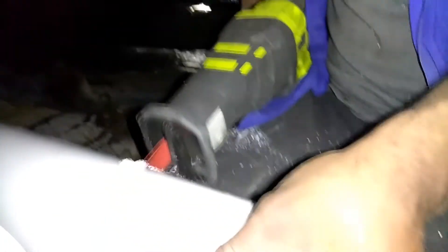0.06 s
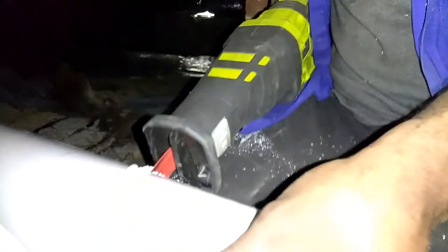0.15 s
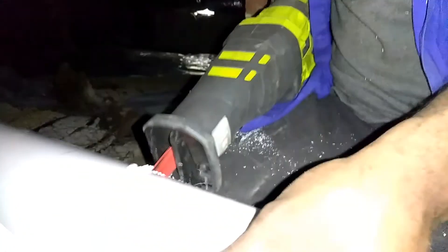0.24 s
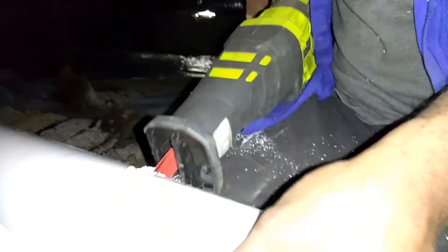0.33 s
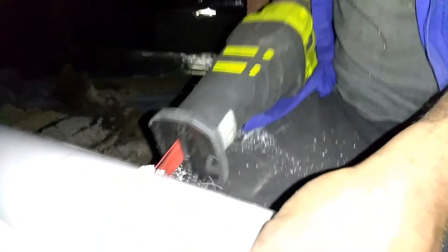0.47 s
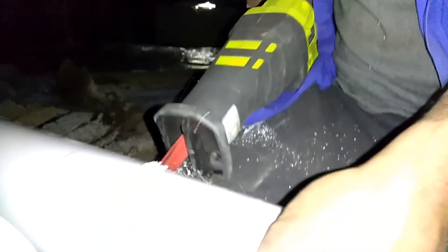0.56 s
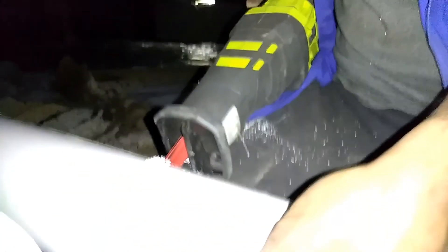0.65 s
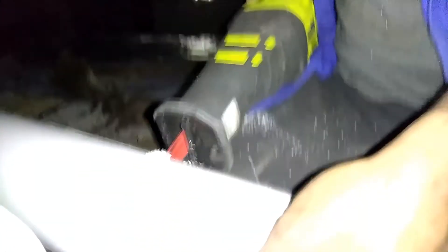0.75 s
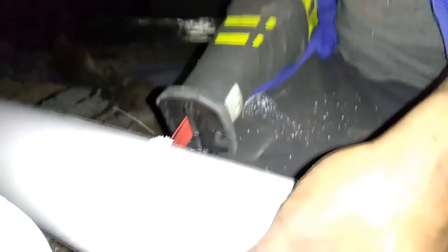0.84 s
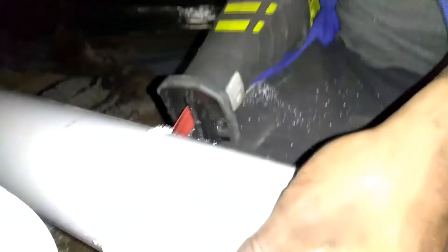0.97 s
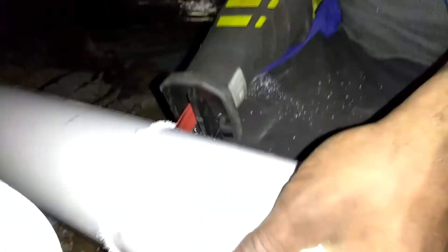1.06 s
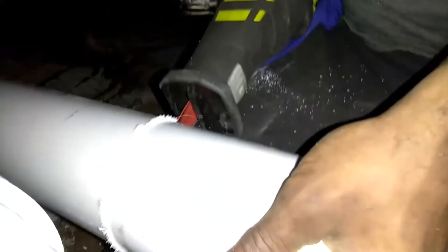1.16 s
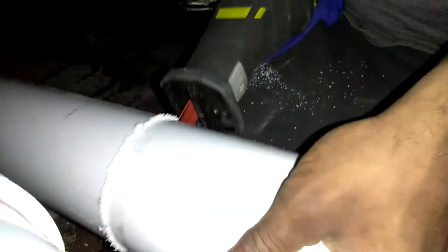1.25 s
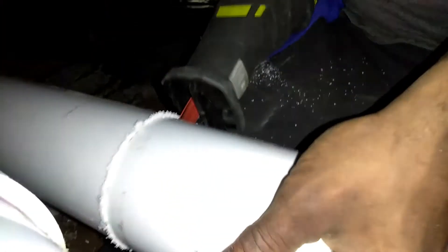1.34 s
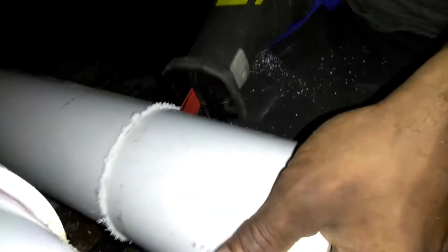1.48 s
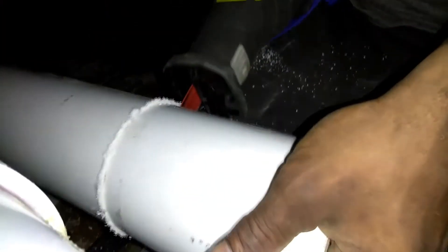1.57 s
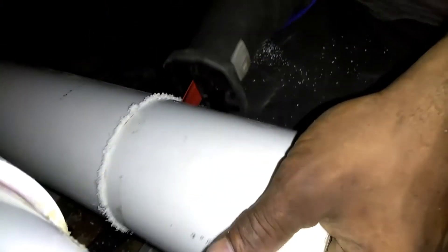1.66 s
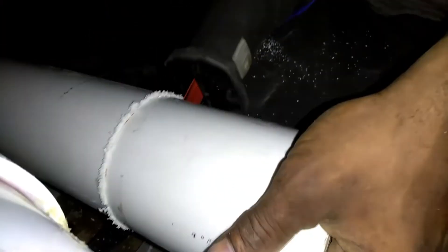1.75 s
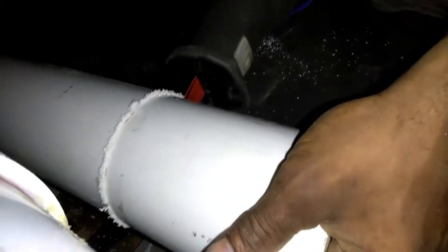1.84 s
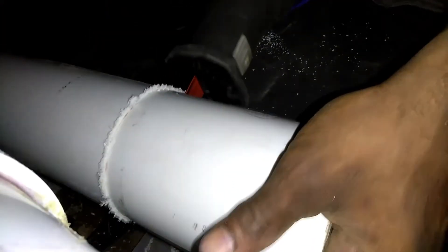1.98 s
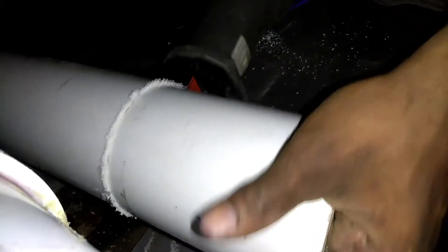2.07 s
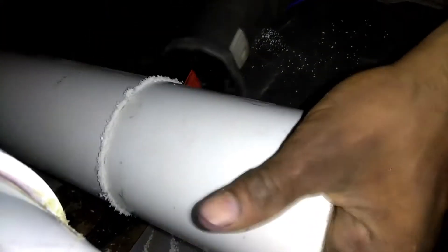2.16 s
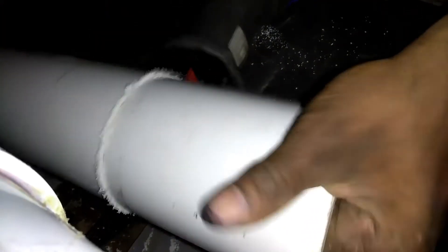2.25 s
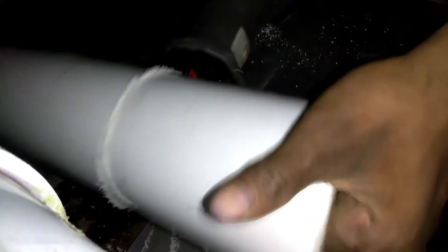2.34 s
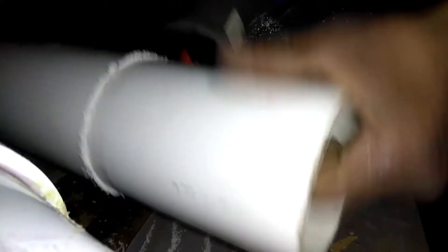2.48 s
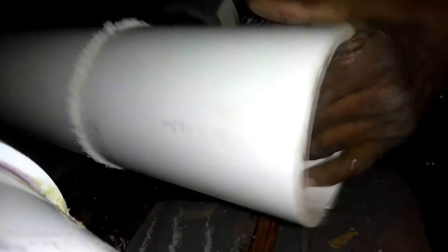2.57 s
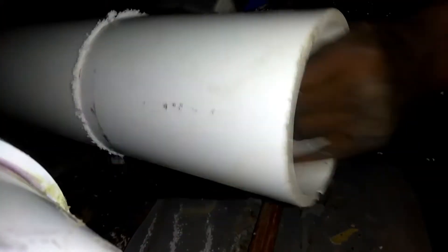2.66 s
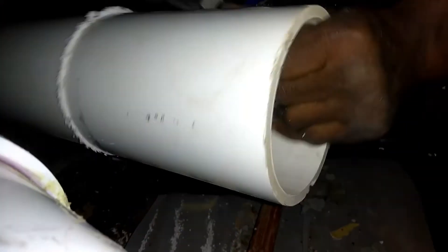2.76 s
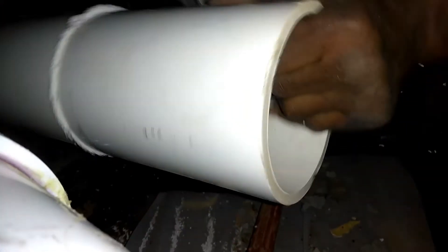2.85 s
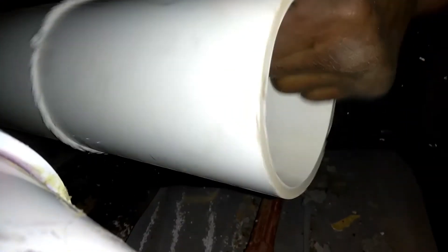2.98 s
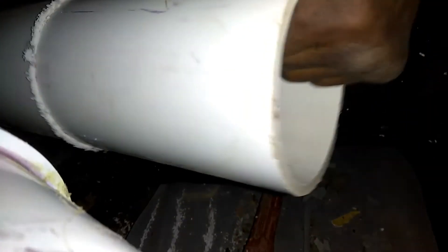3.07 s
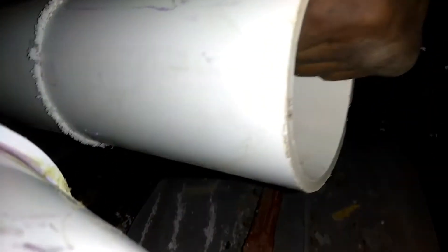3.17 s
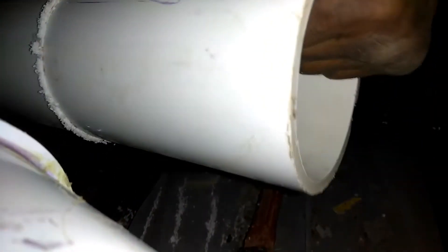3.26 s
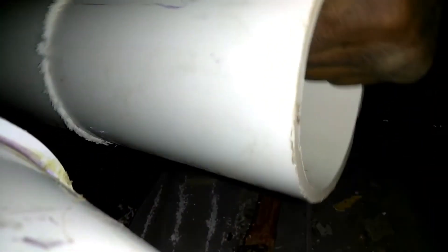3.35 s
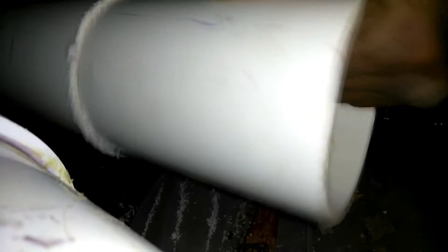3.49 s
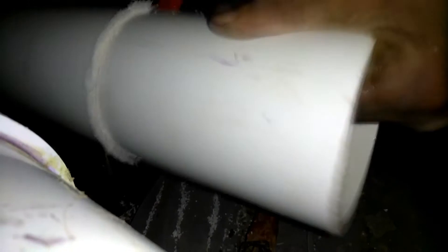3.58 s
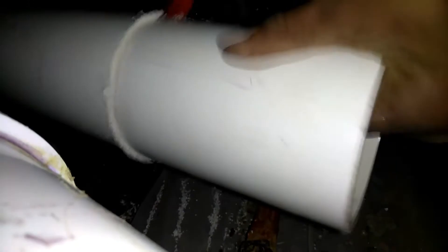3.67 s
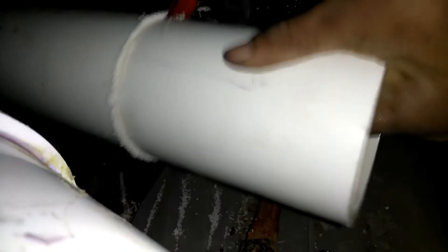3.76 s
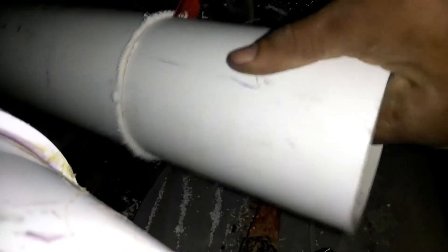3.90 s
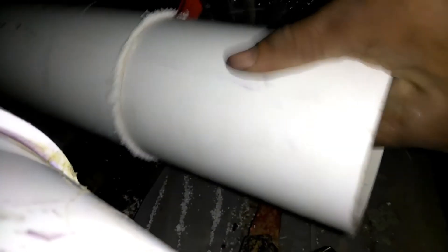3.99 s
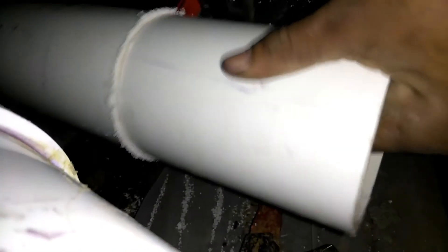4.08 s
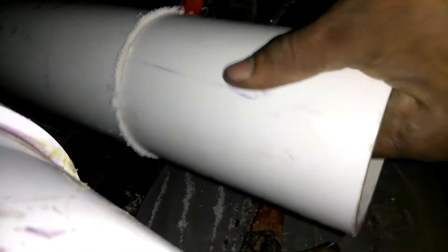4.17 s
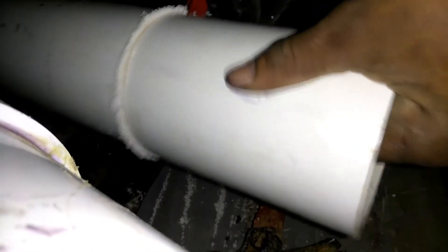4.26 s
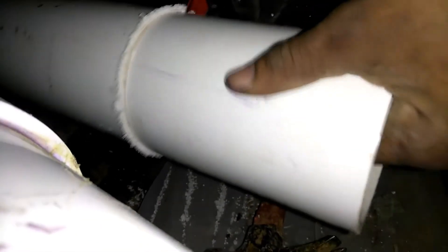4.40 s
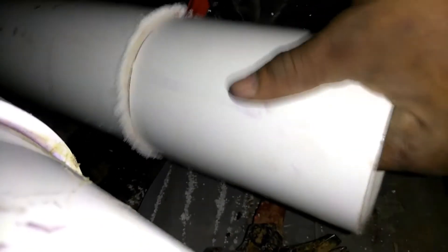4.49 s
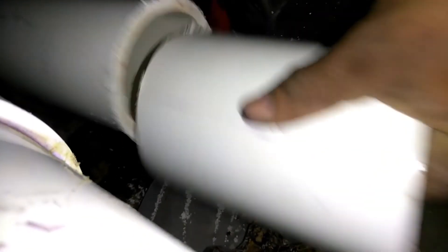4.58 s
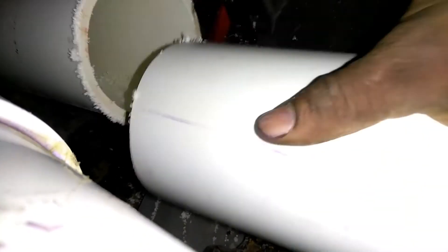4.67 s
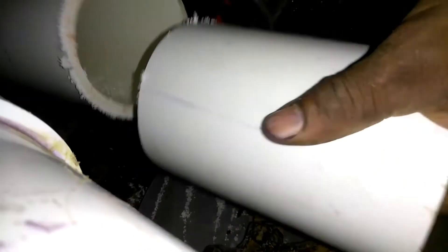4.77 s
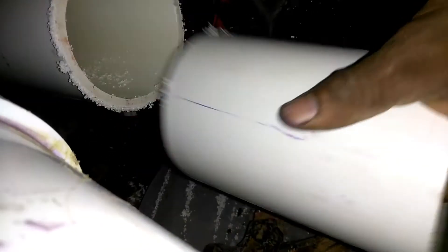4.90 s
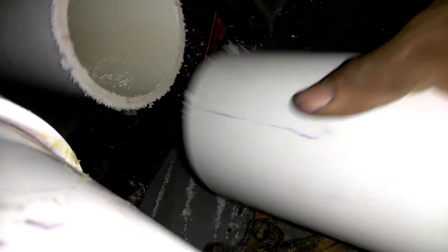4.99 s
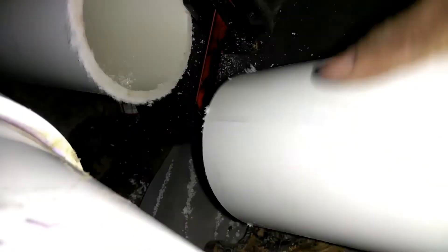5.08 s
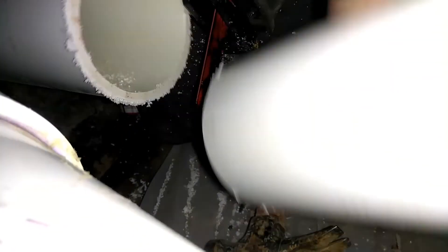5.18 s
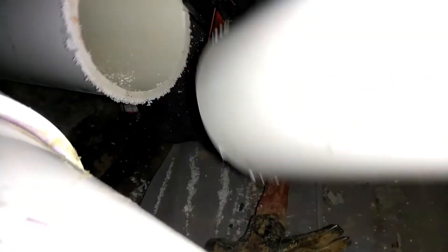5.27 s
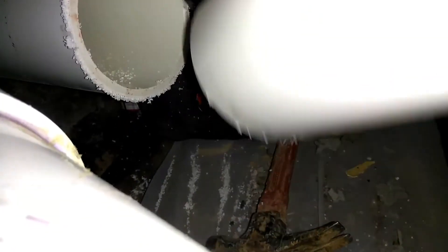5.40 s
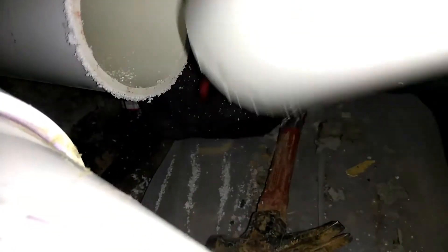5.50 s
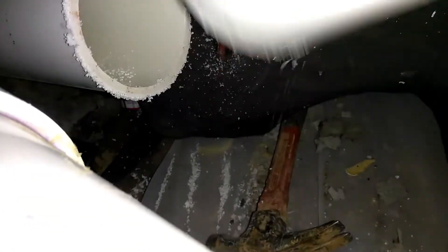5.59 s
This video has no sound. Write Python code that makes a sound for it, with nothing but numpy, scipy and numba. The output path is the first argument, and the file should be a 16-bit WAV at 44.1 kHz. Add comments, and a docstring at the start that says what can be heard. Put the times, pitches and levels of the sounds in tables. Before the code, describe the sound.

Up close, a power saw buzzes harshly through a hollow plastic pipe, stops, restarts with a bark, cuts the end free and runs down.

```python
"""A reciprocating saw cuts a plastic pipe at close range: teeth rasp the wall and ring the blade, gearbox
rattles, motor whines, the wall sings; blade chirps, microphone thumps, jolts and chatter follow. It runs down
at 2.55 s; in the pause the pipe ticks, rubs and creaks on the blade. At 3.3 s the blade slaps, bites and cuts
the end free at 4.58 s; run-down from 4.99 s leaves low tones and rubbing. Grains, noise and sines drive
resonances; hum and rumble lie below; two unequal ports limit, and the loudest peaks flatten."""
import sys
import numpy as np
from scipy import signal
from scipy.fft import rfft, irfft, next_fast_len
from scipy.io import wavfile
from scipy.ndimage import uniform_filter1d
from numba import njit

SR = 44100
rng = np.random.default_rng(int(sys.argv[2]) if len(sys.argv) > 2 else 0)


def dump_mix(stems):
    """Bounce the given channels to the path in sys.argv[1] as a 16-bit WAV at rate SR."""
    frames = np.atleast_2d(stems).T  # one column per channel
    limited = np.clip(frames, -1, 1)  # hard clip at full scale
    pcm = np.round(limited * 32767).astype(np.int16)
    wavfile.write(sys.argv[1], SR, pcm)


N = 248539

# Mode and colour levels are relative: each set is scaled to keep the power of white noise.
# low hum of the place: f/Hz, relative level/dB
HUM_TONES = [(59.2, -42), (91.5, -44)]
# rumble of the place: f/Hz, density/dB per Hz
AIR_COLOUR = [(25, -6), (60, 4.5), (120, -8), (180, -7.5), (250, -12.5), (400, -22), (700, -19),
              (1500, -28.5), (5000, -41), (8000, -32.5), (12000, -21), (15500, -46)]
# trigger: on t/s, off t/s, run-down/dB per s
TRIGGER_RUNS = [(-.1, 2.553, 158), (3.302, 4.992, 127.5)]
# crank speed under load, one list per run: t/s, rate/strokes per s
CRANK_SPEEDS = [
    [(0, 40.11), (.2, 37.8), (.4, 37.15), (.6, 38.85), (.75, 37.41), (1.55, 37.14), (1.9, 38.8),
     (2.1, 38.87), (2.4, 34.59)],
    [(3.45, 36.84), (3.65, 34.02), (3.85, 36.4), (4.1, 36), (4.5, 37.2), (4.62, 40)],
]
# how firmly the teeth engage: t/s, stroke depth/0-1
FEED_DEPTH = [(0, 0.32), (.55, 0.38), (.74, 0.23), (.95, 0.35), (1.3, 0.43), (2.2, 0.16), (2.55, 0.49),
              (2.65, 0.46), (3.35, 0.2), (3.6, 0.34), (4.1, 0.15), (4.7, 0.16), (5.0, 0), (5.12, 0.04)]
# first cut, loose and loud, then settled in the kerf:
# t/s, relative levels/dB of pipe wall, gearbox rattle, blade ring, tooth hiss
CUT_1_LEVELS = [(0, -19, -17.5, -19.5, -27.5), (.4, -20.5, -21.5, -20, -18.5), (.7, -17, -26, -27, -12),
                (.84, -21.5, -18.5, -18, -15.5), (1.05, -27.5, -26.5, -20.5, -7.5),
                (1.45, -19, -24.5, -21, -7), (2.0, -24, -30, -35.5, -15), (2.25, -25.5, -23, -27.5, -7.5),
                (2.43, -23, -27.5, -27.5, -10.5), (2.5, -22.5, -48, -28.5, -16.5),
                (2.56, -27.5, -34.5, -39, -21), (2.68, -28.5, -34, -38, -31)]
# second cut bites, breaks through, runs free: same columns
CUT_2_LEVELS = [(3.33, -27, -13, -30, -10.5), (3.49, -34.5, -20, -23, -19.5), (3.59, -18, -17, -21, -12.5),
                (3.95, -18, -12.5, -20, -9.5), (4.57, -20, -15.5, -15.5, -8), (4.65, -25.5, -20, -24, -8),
                (4.85, -32.5, -23, -28.5, -17), (4.89, -21, -11, -22.5, -4),
                (4.98, -45.5, -15.5, -24.5, -13.5)]
# wall resonance, shifting with grip and kerf length: t/s, f/Hz
WALL_PITCH = [(0, 575), (.13, 687), (.86, 590), (.98, 437), (1.09, 480), (1.25, 620), (2.1, 540),
              (2.27, 673), (4.4, 642)]
# pipe resonances: f/Hz, width/Hz, level/dB
PIPE_RESONANCES = [(475, 193, 1), (638.5, 12, 12), (785, 120, 0), (975, 150, 1.5), (1330, 31, 2),
                   (1793, 64, -5), (2243, 33, -1.5), (2467, 71, 1.5)]
# blade resonances: f/Hz, width/Hz, level/dB
BLADE_RESONANCES = [(3074, 140, -5.5), (3620, 75, -15), (4075, 85, 2), (4332, 81, 2), (4664, 110, -2),
                    (5140, 37, -0.5), (5910, 120, -7)]
# gearbox rattle: f/Hz, density/dB per Hz
GEARBOX_COLOUR = [(30, -70), (120, -5.5), (250, -4.5), (350, -6.5), (600, -4.5), (900, -4.5), (1200, 2),
                  (1700, 3), (2200, 3.5), (2900, 1.5), (3550, -2.5), (4400, -11), (5600, -3.5), (7500, -5),
                  (10000, -1), (15000, -28)]
# tooth hiss: f/Hz, density/dB per Hz
TEETH_COLOUR = [(3500, -49), (5500, -16), (7500, -4.5), (9500, 0), (10600, 3), (11500, 10), (12200, 9.5),
                (13200, 8.5), (14400, 0), (15500, -4.5)]
# shaking of the whole pipe: f/Hz, density/dB per Hz
SHAKE_COLOUR = [(25, -42.5), (55, -25), (85, -2.5), (120, -3), (170, 1), (260, -8), (450, -19), (1000, -58)]
# blade squeals: f/Hz, width/Hz, relative level/dB, moment/turns
SQUEAL_RINGS = [(10690, 200, -1, -0.2), (11940, 300, 2.5, 0.2)]
# all squeals together: t/s, relative level/dB
SQUEAL_LEVELS = [(0, -17), (.6, -18), (.9, -13.5), (1.5, -10.5), (1.8, -18), (2.4, -17.5), (2.55, -39),
                 (3.3, -21), (3.6, -12), (4.6, -14)]
# plunger drone: multiple of stroke rate/1, level at full stroke depth/dB
THROB_HARMONICS = [(1, -44), (2, -34), (3, -34.5), (4, -38)]
# wall note on its strongest mode, deep kerf: t/s, f/Hz, level/dB
SINGING_NOTE = [(0, 656, -32), (.12, 673, -26), (.4, 645, -22), (.65, 650, -31.5), (.85, 613, -28.5),
                (.95, 651, -54)]
# upper modes ringing along with that note: f/Hz, width/Hz, level/dB
SINGING_RESONANCES = [(1781, 62, -5), (2586, 69, -6.5), (3030, 110, -4), (4740, 180, -7.5),
                      (5780, 150, -13.5), (12050, 680, -7), (14200, 780, -9)]
# blade chirp, falling as its free length grows: t/s, f/Hz, level/dB
CHIRP_NOTE = [(0, 4780, -20.5), (.3, 4570, -16.5), (.5, 4610, -27), (.72, 4370, -32), (.83, 4280, -13.5),
              (1.1, 4090, -27.5), (1.2, 4265, -18), (1.4, 4275, -20.5), (1.7, 4193, -31), (2.0, 4070, -45)]
# low thumps as the microphone is shaken or handled:
# t/s, thump level/dB, judder level/dB, judder t60/s, loose-end ring level/dB
MIC_THUMPS = [(0.657, -19.5, -23.5, 0.43, -34), (0.7, -24, -32.5, 0.2, -48), (0.748, -27, -26, 0.28, -50),
              (0.79, -25, -32.5, 0.15, -49), (3.305, -22, -21, 0.46, -36), (4.868, -22.5, -21, 0.56, -25.5),
              (4.974, -27, -31, 0.17, -43)]
# judder: f/Hz, density/dB per Hz
JUDDER_COLOUR = [(25, -34), (55, -11), (85, -6.5), (130, -3.5), (175, -5), (230, -14), (400, -33),
                 (1000, -65)]
# loose end of the pipe: f/Hz, width/Hz, level/dB
LOOSE_END_RESONANCES = [(377, 150, -23), (1105, 68, 9), (1217, 73, 7.5), (1440, 67, 2), (2046, 110, 7),
                        (2530, 67, -17), (4510, 90, -12.5)]
# blade binds and jolts the pipe: t/s, level/dB, length/s
BLADE_JOLTS = [(0.667, -3.5, 0.03), (0.699, -9, 0.059), (0.785, -13, 0.03), (2.202, 1.5, 0.023),
               (2.321, -9.5, 0.03), (2.331, -13, 0.03), (2.387, -21.5, 0.049), (2.422, -13.5, 0.021),
               (2.46, -27.5, 0.055), (2.503, -31.5, 0.015), (2.518, -20.5, 0.013), (2.581, -23, 0.036),
               (3.294, -33.5, 0.011), (3.304, -12, 0.015), (3.317, -18, 0.12), (3.583, -13.5, 0.023),
               (3.694, -11, 0.026), (3.719, -7.5, 0.014), (4.866, -12.5, 0.029)]
# teeth chatter on the wall, one list per cut: t/s, f/Hz, level/dB
CHATTER_NOTES = [
    [(.85, 500, -41.5), (.93, 477.9, -17.5), (1.0, 452.6, -22), (1.11, 474, -18), (1.18, 650, -32),
     (1.26, 516, -17), (1.33, 750, -34), (1.46, 490, -17.5), (1.56, 590, -27), (1.7, 500, -16),
     (1.88, 590, -26), (2.0, 480, -26), (2.15, 484, -19)],
    [(3.52, 560, -16.5), (3.56, 559.8, -29), (3.6, 590, -16), (3.72, 612.5, -21), (4.1, 539.7, -20),
     (4.3, 490, -21), (4.61, 579, -20.5)],
]
# burrs snap at the cut edge: t/s, treble level/dB, body level/dB, t60/s
BURR_TICKS = [(2.61, -17, -42, 0.026), (2.642, -30, -35, 0.072), (2.742, -29.5, -43, 0.02),
              (2.779, -36, -58, 0.015), (2.902, -22, -40, 0.042), (2.909, -29, -35.5, 0.038),
              (2.946, -22, -37, 0.02), (2.987, -25, -44, 0.016), (3.017, -25.5, -54, 0.011),
              (3.058, -19.5, -58, 0.01), (3.2, -30, -20, 0.018), (3.206, -15, -14.5, 0.018),
              (3.234, -39, -44, 0.025), (5.314, -39, -62, 0.015), (5.342, -35.5, -58, 0.014),
              (5.522, -43, -66, 0.016), (5.576, -35, -58, 0.014)]
# treble of a snap: f/Hz, density/dB per Hz
SNAP_COLOUR = [(700, -22), (3000, -18.5), (6000, -16.5), (8500, -4.5), (10500, 10), (12000, 12), (13500, 4),
               (15500, -17.5)]
# wall rung by a snap, one mode lingers: f/Hz, width/Hz, level/dB
SNAP_RESONANCES = [(950, 400, -13), (1710, 330, 1), (2213, 18, 3), (2380, 630, 7.5), (3800, 300, 6.5),
                   (5100, 900, -14), (7540, 2000, -21)]
# hand slides on the plastic: t/s, level/dB, t60/s
HAND_RUBS = [(2.72, -45, 0.43), (2.888, -35.5, 0.37), (2.96, -44.5, 1), (3.13, -48, 1.0), (5.19, -45, 0.6),
             (5.4, -58, 0.9), (5.515, -49.5, 0.68), (5.57, -57, 0.27)]
# rubbing: f/Hz, density/dB per Hz
RUB_COLOUR = [(300, -7.5), (700, -1), (1200, -11), (3000, -2), (6000, -11.5), (8500, -5), (10500, 5),
              (12000, 6), (13500, -0.5), (15500, -12)]
# last strokes drag in the kerf: t/s, level/dB, length/s
COAST_DRAGS = [(2.645, -47, .025), (2.71, -47, .035)]
# kerf rung by the drags: f/Hz, width/Hz, level/dB
DRAG_RESONANCES = [(1090, 200, 7), (2500, 500, -1), (3570, 400, 1.5)]
# kerf rung by a slip: f/Hz, width/Hz, level/dB
KERF_RESONANCES = [(500, 190, -25), (1000, 300, -6.5), (1430, 200, -22), (1710, 150, 6), (2140, 180, 8),
                   (3360, 250, 3.5), (3750, 260, 2), (4900, 410, -13), (11500, 2300, -29)]
# restart, blade slaps in the kerf until it bites: t/s, level/dB
SLAP_LEVELS = [(3.306, -14.5), (3.39, -16), (3.44, -24), (3.48, -32.5)]
# resonances rung by the slaps: f/Hz, width/Hz, level/dB
SLAP_RESONANCES = [(1270, 180, -10.5), (1580, 90, 1.5), (1850, 90, 3), (2150, 150, 2), (2600, 400, -5),
                   (11800, 2200, -11.5)]
# tones lingering in the open pipe: f/Hz, width/Hz, level/dB
HOLLOW_RESONANCES = [(179, 14, -8), (246, 12, 4.5), (277, 12, 1), (328, 18, -6)]
# microphone ports: f/Hz, side minus mid level/dB, left minus right level/dB
PORT_RESPONSE = [(60, 9.5, -1), (250, 6.5, 1.5), (623, 8, 0), (1210, 1.5, 0.5), (2430, 0, 3), (4260, 0, 0),
                 (8000, -0.5, 2), (10020, 1, 7), (10500, -35.5, 33.5), (13500, 8, 16.5), (16100, -21, 14.5)]

TIME = np.arange(N) / SR
SIZE = next_fast_len(N + 4096, True)
FREQ = np.fft.rfftfreq(SIZE, 1 / SR) + 1e-3
OPPOSED = np.array([[1], [-1]])  # mid and side of opposite sign

HUM_WAVER_DB = 3.5
ATTACK_S, SPIN_UP_S, COAST_S = .023, .0186, .26
WALL_WANDER, WALL_WANDER_PER_S = .087, 10
WALL_LOWEST_HZ = 300  # the wall radiates little below this
# shares of the mode frequency: free length changes bend the blade, grip bends the pipe
BLADE_SWEEP, BLADE_WANDER, PIPE_WANDER = .022, .014, .014
STROKE_SCATTER_DB, BITE_SCATTER_DB = 1.1, 1.8
PULL_MOMENT_TURNS, PULL_LENGTH_TURNS, PULL_DB = .8, .3, 9  # gain at full stroke depth
SHAKE_DB = -8  # relative to the wall at full stroke depth
SQUEAL_DEPTH = .85
CHIRP_MOMENT_TURNS, CHIRP_LENGTH_TURNS, CHIRP_GLIDE, CHIRP_WANDER = .88, .36, .06, .018
THUMP_HZ, THUMP_RISE_S, THUMP_T60_S = 134, .007, .07
FREE_S, ATTACHED_DB, FREE_DB = 4.58, -45, -25.5
LOOSE_END_FADE_DB_PER_S = 89.5
END_RING_RISE_S, END_RING_T60_S = .029, .35
JOLT_SHAKE_DB = -21  # relative to the jolt
BITE_SHARPNESS, BITE_GLIDE, BITE_WANDER = 1.6, .07, .05
RUB_ATTACK_S, RUB_UNEVEN_DB, RUB_UNEVEN_PER_S = .037, 2, 90
CREAK_S, CREAK_HOLD_S, CREAK_DB = 3.173, .012, -24.5
CREAK_RISE_DB_PER_S, CREAK_FALL_DB_PER_S = 850, 700
SLIP_HZ, SLIP_SAG_OCTAVES_PER_S = 481, 16
CREAK_TOP_HZ = 6040  # the plastic dulls the slips above this
HOLLOW_RISE_S, HOLLOW_DB, HOLLOW_T60_S = .029, -52, 2.9
PORT_TOP_HZ = 15650


def undb(db):
    """Decibels to gain."""
    return 10 ** (np.asarray(db) / 20)


def curves(rows):
    """Table columns, joined by straight lines in time."""
    t_s, *columns = np.transpose(rows)
    return [np.interp(TIME, t_s, column) for column in columns]


def during(rows):
    """1 while a table lasts, with short ramps outside."""
    start_s, end_s = rows[0][0], rows[-1][0]
    return np.interp(TIME, [start_s - .008, start_s, end_s, end_s + .011], [0, 1, 1, 0])


def colour(points, column=1):
    """Gain at every frequency, from dB points joined over log frequency."""
    table = np.transpose(points)
    return undb(np.interp(np.log(FREQ), np.log(table[0]), table[column]))


def modes(rows):
    """Complex response of a set of damped resonances."""
    return sum(undb(db) / (1 + 1j * (FREQ ** 2 - hz ** 2) / (FREQ * width_hz))
               for hz, width_hz, db in rows)


def through(x, response):
    """Filter with a response scaled so that white noise keeps its power."""
    response = response / np.sqrt(np.mean(abs(response) ** 2))
    return irfft(rfft(x, SIZE) * response, SIZE)[..., :N]


def unit(x):
    """Scale to rms 1."""
    return x / np.sqrt(np.mean(x ** 2))


def noise():
    """Two unrelated white noises, for mid and side."""
    return rng.standard_normal((2, N))


def walk(knots_per_s):
    """Random curve with a spread near 1: normal draws joined by lines."""
    knots = rng.standard_normal(4096)
    return 1.5 * np.interp(TIME * knots_per_s, np.arange(len(knots)), knots)


def grains(per_s, spread_db):
    """Tiny random impacts of unequal size, each in both mid and side."""
    hits = rng.random(N) < per_s / SR
    size = undb(spread_db * np.minimum(rng.exponential(size=N), 4))
    return unit(noise() * hits * size)


@njit
def resonator(x, hz, width_hz):
    """Band-pass with a moving centre and unit peak gain."""
    y, band, low = np.empty(len(x)), 0., 0.
    for i in range(len(x)):
        g, k = np.tan(np.pi * hz[i] / SR), width_hz / hz[i]
        v = (band + g * (x[i] - low)) / (1 + g * (g + k))
        band, low, y[i] = 2 * v - band, low + 2 * g * v, k * v
    return y


def bending(x, rows, bend):
    """Ring modes that all shift by one moving factor, scaled by noise power."""
    power = sum(undb(db) ** 2 * np.pi * width_hz / SR for _, width_hz, db in rows)
    rung = [sum(undb(db) * resonator(part, hz * bend, float(width_hz)) for hz, width_hz, db in rows)
            for part in x]
    return np.array(rung) / np.sqrt(power)


def swell(t_s, attack_s, t60_s):
    """Envelope: linear rise from t_s, then exponential decay."""
    age_s = TIME - t_s
    return np.clip(age_s / attack_s, 0, 1) * undb(-60 * np.maximum(age_s - attack_s, 0) / t60_s)


def pushes(rows):
    """Sum of short rounded pushes, each the root of a half sine."""
    total = np.zeros(N)
    for t_s, db, length_s in rows:
        arch = np.sin(np.pi * np.clip((TIME - t_s) / length_s, 0, 1))
        total += undb(db) * np.sqrt(np.maximum(arch, 0))
    return total


def running(on_s, off_s, fade_db_per_s):
    """Trigger envelope: quick onset, full level, steady fall in dB."""
    return np.clip((TIME - on_s) / ATTACK_S, 0, 1) * undb(-fade_db_per_s * np.maximum(TIME - off_s, 0))


def crank():
    """Crank phase in turns: spins up, works under load, coasts; restarts with each run."""
    turns = np.zeros(N)
    for (on_s, off_s, _), speed in zip(TRIGGER_RUNS, CRANK_SPEEDS):
        spin_up = 1 - np.exp(-np.maximum(TIME - on_s, 0) / SPIN_UP_S)
        coast = np.exp(-np.maximum(TIME - off_s, 0) / COAST_S)
        run_turns = .73 + np.cumsum(curves(speed)[0] * spin_up * coast) / SR
        turns = np.where(TIME >= on_s, run_turns, turns)
    return turns


def strokes(turns, depth, bite=.35, return_share=.2):
    """Force on the teeth: each turn bites quickly, eases off, with a lighter return."""
    angle = 2 * np.pi * turns
    shape = np.cos(angle) - bite * np.sin(2 * angle) + return_share * np.cos(2 * angle)
    return np.exp(depth * shape - depth ** 2 / 2)


def gate(turns, moment_turns, length_turns):
    """Opens firmly for part of every turn, centred on a moment of the stroke."""
    away_turns = abs((turns - moment_turns + .5) % 1 - .5)
    return 1 / (1 + (2 * away_turns / length_turns) ** 6)


def background():
    """Wavering hum tones over coloured-noise rumble."""
    hum = np.zeros((2, N))
    for hz, db in HUM_TONES:
        cycles = hz * TIME + .046 * walk(5.2) + rng.random((2, 1))
        hum += undb(db) * np.sqrt(2) * np.sin(2 * np.pi * cycles)
    rumble = through(noise(), colour(AIR_COLOUR))
    return undb(-7 + HUM_WAVER_DB * walk(23)) * hum + undb(-50.5 + 1.9 * walk(22)) * rumble


def pipe_wall(rasp, force):
    """Tooth grains ring the pipe modes; stroke-driven noise flexes one moving wall mode."""
    wall_hz = curves(WALL_PITCH)[0] * (1 + WALL_WANDER * walk(WALL_WANDER_PER_S))
    flexing = unit(np.array([resonator(part, wall_hz, 86.0) for part in force * noise()]))
    wall = .76 * bending(rasp, PIPE_RESONANCES, 1 + PIPE_WANDER * walk(45)) + .4 * flexing
    return through(wall, 1 / np.hypot(1, (WALL_LOWEST_HZ / FREQ) ** 2))


def blade_ring(turns, force):
    """Tooth grains ring blade modes that bend as the free length slides."""
    bend = 1 - BLADE_SWEEP * np.sin(2 * np.pi * (turns + .055)) + BLADE_WANDER * walk(60)
    return bending(force ** 1.2 * grains(per_s=6000, spread_db=0.0), BLADE_RESONANCES, bend)


def gearbox_rattle(force):
    """Dense coloured impacts that follow the stroke force, with scatter."""
    rattle = force ** .64 * undb(STROKE_SCATTER_DB * walk(45)) * grains(per_s=11000, spread_db=.45)
    return through(rattle, colour(GEARBOX_COLOUR))


def motor_whine(turns):
    """Shaft harmonics at a fixed multiple of the stroke rate, with phase wander."""
    shaft_turns = 55.3 * turns + .4 * walk(25)
    harmonics_db = [-14, -16, -15, -37, -16]
    whine = sum(undb(db) * np.sin(2 * np.pi * k * shaft_turns) for k, db in enumerate(harmonics_db, 1))
    return whine * undb(1.2 * walk(25))


def tooth_hiss(turns, depth):
    """Fine bright grains, harder while the teeth are pulled through the wall."""
    opening = gate(turns, PULL_MOMENT_TURNS, PULL_LENGTH_TURNS)
    pull = undb(PULL_DB * depth * (opening - PULL_LENGTH_TURNS))
    return undb(-2.5) * through(pull * grains(per_s=24000, spread_db=.5), colour(TEETH_COLOUR))


def pipe_shake(force, depth):
    """Stroke force shakes the whole pipe: low coloured noise."""
    return undb(SHAKE_DB) * depth * through(force * noise(), colour(SHAKE_COLOUR))


def squeal(turns):
    """Blade flanks rub in the kerf: a different shrill ring on push and return."""
    rings = np.zeros((2, N))
    for hz, width_hz, db, moment_turns in SQUEAL_RINGS:
        rub = strokes(turns - moment_turns, SQUEAL_DEPTH) * noise()
        rings += undb(db) * through(rub, modes([(hz, width_hz, 0)]))
    return rings / SQUEAL_DEPTH * undb(curves(SQUEAL_LEVELS)[0] - 10)


def throb(turns):
    """Plunger motion as a low drone on multiples of the stroke rate."""
    drone = sum(undb(db + 1.5 * walk(10)) * np.sin(2 * np.pi * (k * turns + rng.random()))
                for k, db in THROB_HARMONICS)
    return drone * OPPOSED


def singing(force):
    """The wall holds a wavering note, opposed at the two ports; upper modes ring along."""
    hz, db = curves(SINGING_NOTE)
    cycles = np.cumsum(hz * (1 + .014 * walk(90.8))) / SR
    note = np.sin(2 * np.pi * cycles) * OPPOSED
    upper = undb(11.5) * bending(force * noise(), SINGING_RESONANCES, 1 + PIPE_WANDER * walk(49))
    return (note * force ** .86 + upper) * undb(db + 2 * walk(29.8)) * during(SINGING_NOTE)


def chirps(turns):
    """Once a stroke the blade rings with a short falling note."""
    hz, db = curves(CHIRP_NOTE)
    pitch_hz = hz * (1 - CHIRP_GLIDE * np.sin(2 * np.pi * (turns - CHIRP_MOMENT_TURNS)))
    note = np.array([np.sin(2 * np.pi * np.cumsum(pitch_hz * (1 + CHIRP_WANDER * walk(500))) / SR)
                     for _ in range(2)])
    level = undb(db + STROKE_SCATTER_DB * walk(37)) * during(CHIRP_NOTE)
    return note * gate(turns, CHIRP_MOMENT_TURNS, CHIRP_LENGTH_TURNS) * level


def saw():
    """Sum of all layers driven by the crank."""
    wall_db, rattle_db, blade_db, hiss_db = curves(list(CUT_1_LEVELS) + list(CUT_2_LEVELS))
    turns = crank()
    depth, = curves(FEED_DEPTH)
    # in each stroke: blade rings, then wall flexes, then pipe shakes
    blade_force, force, shake_force = (strokes(turns - lag_turns, depth) for lag_turns in (-.14, -.02, .08))
    rasp = force * grains(per_s=7000, spread_db=1.5)
    sound = (pipe_wall(rasp, force) + pipe_shake(shake_force, depth)) * undb(wall_db)
    sound = sound + blade_ring(turns, blade_force) * undb(blade_db)
    sound = sound + (gearbox_rattle(force) + motor_whine(turns)) * undb(rattle_db)
    sound = sound + tooth_hiss(turns, depth) * undb(hiss_db) + squeal(turns)
    driven = sound * sum(running(*run) for run in TRIGGER_RUNS)
    # the low drone is heard in the first run only
    driven = driven + depth * throb(turns) * running(*TRIGGER_RUNS[0])
    return driven + singing(force) + chirps(turns) + loose_end(rasp) + chatter(turns) + slaps(turns)


def mic_thumps():
    """Low sine thumps as the microphone is shaken or handled, each with a dull noise judder."""
    thump, judder = np.zeros(N), np.zeros(N)
    for t_s, thump_db, judder_db, judder_t60_s, _ in MIC_THUMPS:
        tone = np.sin(2 * np.pi * THUMP_HZ * (TIME - t_s))
        thump += undb(thump_db) * swell(t_s, THUMP_RISE_S, THUMP_T60_S) * tone
        judder += undb(judder_db) * swell(t_s, THUMP_RISE_S, judder_t60_s)
    return thump * OPPOSED + judder * through(noise(), colour(JUDDER_COLOUR))


def loose_end(rasp):
    """Rasp rings the pipe end: a swell with each thump, and through run 2, more once free."""
    on_s, off_s, _ = TRIGGER_RUNS[1]
    steady = undb(np.where(TIME < FREE_S, ATTACHED_DB, FREE_DB))
    steady = steady * running(on_s, off_s, LOOSE_END_FADE_DB_PER_S)
    swells = sum(undb(db) * swell(t_s, END_RING_RISE_S, END_RING_T60_S) for t_s, *_, db in MIC_THUMPS)
    return through(rasp, modes(LOOSE_END_RESONANCES)) * np.hypot(steady, swells)


def jolts():
    """The blade catches: a burst of rattling grains and low shaking."""
    push = pushes(BLADE_JOLTS)
    rattle = through(push * grains(per_s=2800, spread_db=2.5), colour(GEARBOX_COLOUR))
    return rattle + undb(JOLT_SHAKE_DB) * through(push * noise(), colour(SHAKE_COLOUR))


def chatter(turns):
    """Each bite buzzes the wall for a few cycles; the note sags as the blade slows."""
    hz, db = curves(list(CHATTER_NOTES[0]) + list(CHATTER_NOTES[1]))
    angle = 2 * np.pi * (turns + .026)
    pitch_hz = hz * (1 - BITE_GLIDE * np.sin(angle) + BITE_WANDER * walk(40))
    bite = np.exp(BITE_SHARPNESS * (np.cos(angle) - 1)) * undb(db + BITE_SCATTER_DB * walk(37))
    active = during(CHATTER_NOTES[0]) + during(CHATTER_NOTES[1])
    return np.sin(2 * np.pi * np.cumsum(pitch_hz) / SR) * bite * active * OPPOSED


def burr_ticks():
    """Burrs snap: decaying treble noise plus noise ringing the wall."""
    snap, body = np.zeros(N), np.zeros(N)
    for t_s, snap_db, body_db, t60_s in BURR_TICKS:
        fade = np.exp(-np.log(1000) * np.clip(TIME - t_s, 0, 1) / t60_s) * (TIME >= t_s)
        snap += undb(snap_db) * fade
        body += undb(body_db) * fade
    return through(snap * noise(), colour(SNAP_COLOUR)) + through(body * noise(), modes(SNAP_RESONANCES))


def drags():
    """The last slow strokes scrape dully in the kerf: noise through its modes."""
    return through(pushes(COAST_DRAGS) * noise(), modes(DRAG_RESONANCES))


def rubbing():
    """Hand and burred edge rub the pipe: uneven dense grains, quick onset, slow fade."""
    rub = sum(undb(db) * swell(t_s, RUB_ATTACK_S, t60_s) for t_s, db, t60_s in HAND_RUBS)
    rub = rub * undb(RUB_UNEVEN_DB * walk(RUB_UNEVEN_PER_S))
    return through(rub * grains(per_s=18000, spread_db=-1.5), colour(RUB_COLOUR))


def creak():
    """Kerf sticks and slips on the blade: falling squeak, brightest when loudest."""
    age_s = TIME - CREAK_S
    rise_db = -CREAK_RISE_DB_PER_S * np.maximum(-age_s, 0)
    fall_db = -CREAK_FALL_DB_PER_S * np.maximum(age_s - CREAK_HOLD_S, 0)
    effort = undb(rise_db + fall_db)
    slip_hz = SLIP_HZ * 2 ** np.clip(-SLIP_SAG_OCTAVES_PER_S * age_s, -1, 1)
    cycles = np.cumsum(slip_hz * (1 + .035 * walk(400))) / SR
    slips = unit(np.diff(np.floor(cycles), prepend=0))
    scrape = unit(np.exp(-(cycles % 1) / .4) * noise())
    response = modes(KERF_RESONANCES) / np.hypot(1, FREQ / CREAK_TOP_HZ)
    squeak = through((.75 * slips + .65 * scrape) * effort, response)
    dull = signal.sosfiltfilt(signal.butter(2, 2600, fs=SR, output="sos"), squeak)
    return undb(CREAK_DB) * (dull + effort * (squeak - dull))


def slaps(turns):
    """At the restart the blade bangs on the kerf at both stroke ends: a harsh bark."""
    blows = strokes(2 * turns, .35) * grains(per_s=3000, spread_db=1.0)
    level = undb(curves(SLAP_LEVELS)[0]) * during(SLAP_LEVELS)
    return through(blows * level, modes(SLAP_RESONANCES))


def hollow():
    """Air in the open pipe rings on through the last run-down: noise in narrow modes."""
    level = undb(HOLLOW_DB) * swell(TRIGGER_RUNS[1][1], HOLLOW_RISE_S, HOLLOW_T60_S)
    return through(level * noise(), modes(HOLLOW_RESONANCES))


def room(x, t60_s, wet_db):
    """Short diffuse tail from floor and walls: convolution with decaying noise."""
    tail = unit(noise() * np.exp(-np.log(1000) * TIME / t60_s) * (TIME > .006)) / np.sqrt(N)
    return x + undb(wet_db) * signal.fftconvolve(x, tail, axes=1)[:, :N]


def scene():
    """Saw, pipe and thumps with the room tail, over the background, as mid and side."""
    near = saw() + mic_thumps() + jolts() + burr_ticks() + drags() + rubbing() + creak() + hollow()
    return room(near, t60_s=.17, wet_db=-15) + background()


def limiter(x, top_db, window_s):
    """Fast gain control riding each port's own short-term power."""
    power = uniform_filter1d(x ** 2, max(int(window_s * SR), 1), axis=1)
    return x / (1 + (power / undb(top_db) ** 2) ** 4) ** (1 / 8)


def record(dry):
    """Ports hear bass mostly in opposite phase, the left brighter, and limit; the loudest peaks flatten; cut
    the top."""
    width, lean = colour(PORT_RESPONSE, column=1), np.sqrt(colour(PORT_RESPONSE, column=2))
    mid, side = rfft(dry, SIZE)
    ports = np.array([(mid + width * side) * lean, (mid - width * side) / lean])
    # keep the power of the ports' mean for unrelated, equal mid and side
    ports = ports / np.hypot((lean + 1 / lean) / 2, width * (lean - 1 / lean) / 2)
    held = limiter(irfft(ports, SIZE)[:, :N], top_db=-5.5, window_s=.007)
    top_cut = signal.ellip(10, .2, 70, PORT_TOP_HZ, fs=SR, output="sos")
    return signal.sosfilt(top_cut, np.clip(held, -1, 1))


dry = scene()
out = record(dry)
dump_mix(out)
```